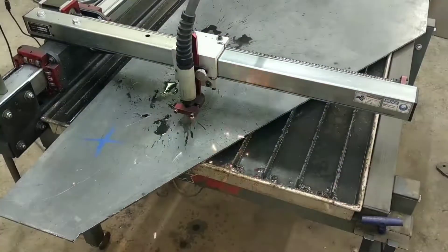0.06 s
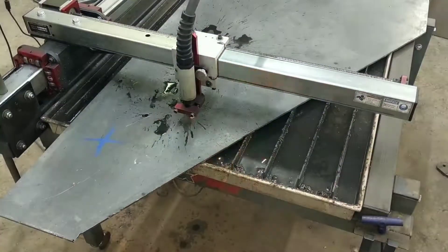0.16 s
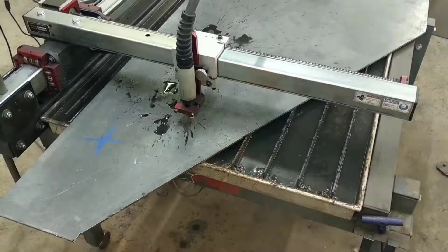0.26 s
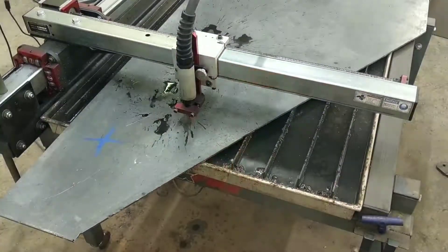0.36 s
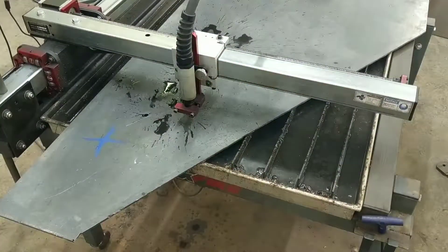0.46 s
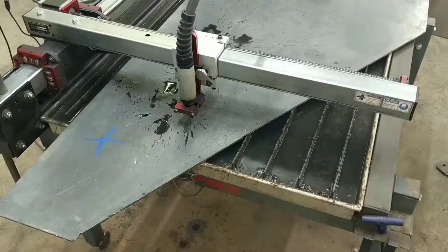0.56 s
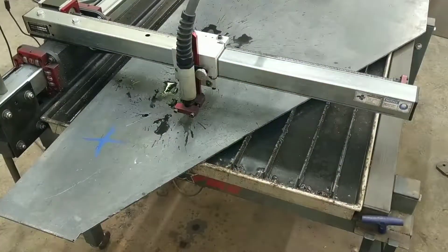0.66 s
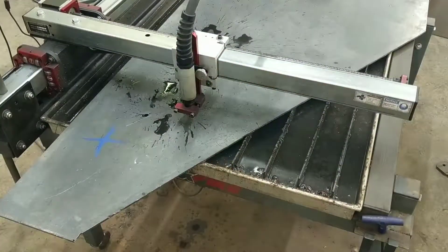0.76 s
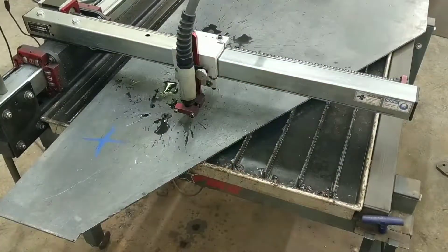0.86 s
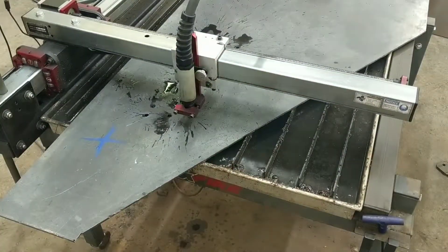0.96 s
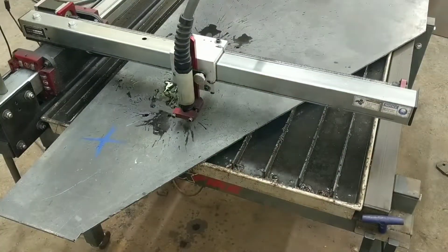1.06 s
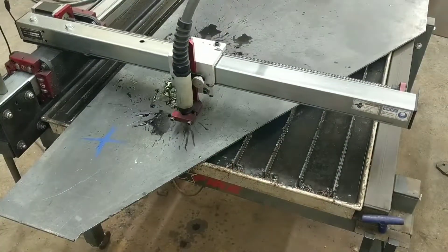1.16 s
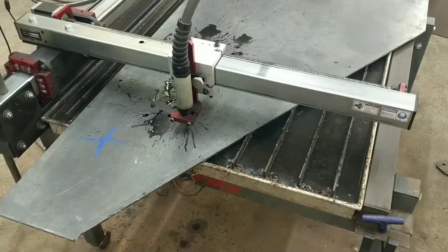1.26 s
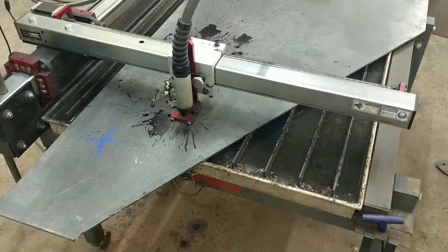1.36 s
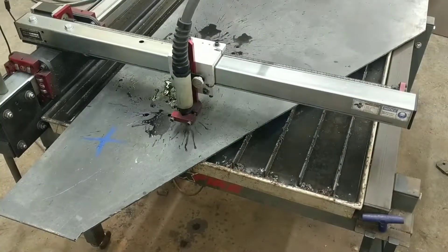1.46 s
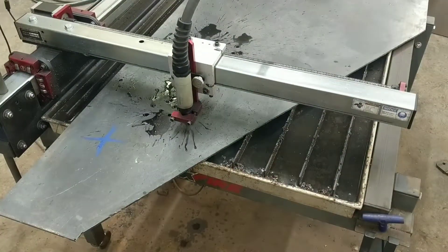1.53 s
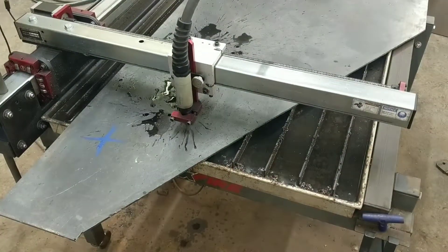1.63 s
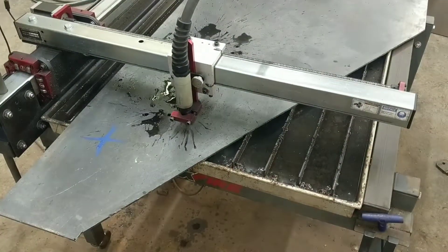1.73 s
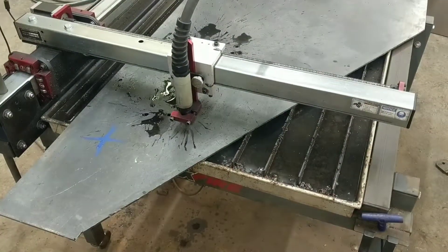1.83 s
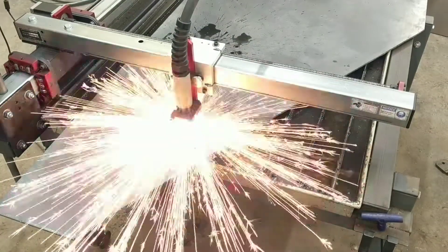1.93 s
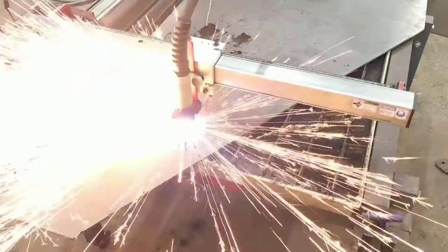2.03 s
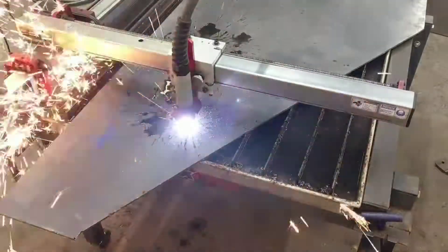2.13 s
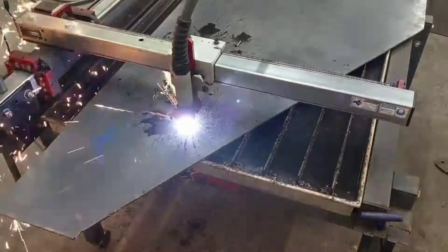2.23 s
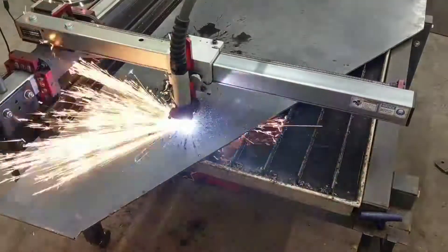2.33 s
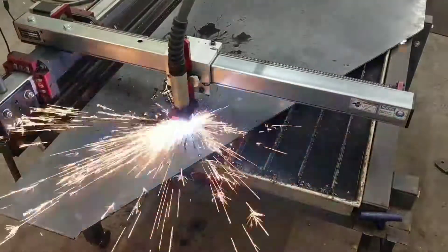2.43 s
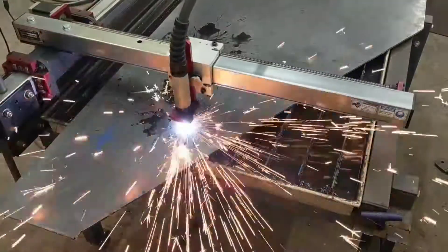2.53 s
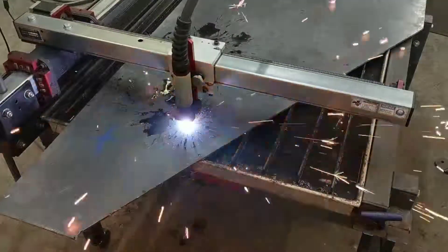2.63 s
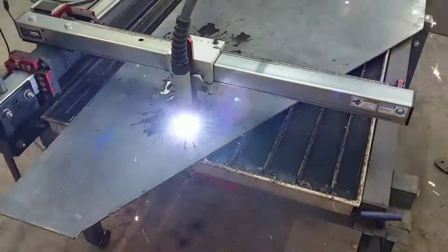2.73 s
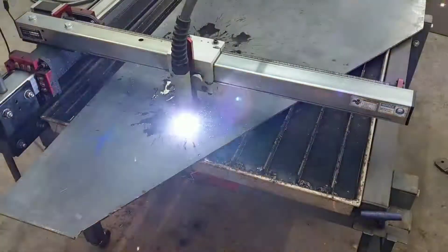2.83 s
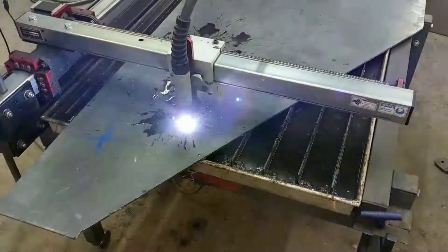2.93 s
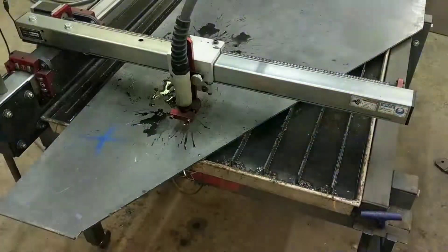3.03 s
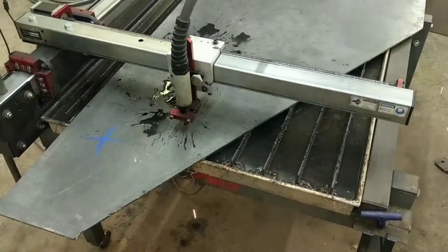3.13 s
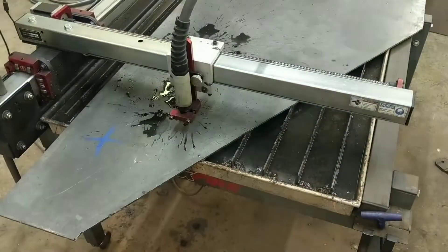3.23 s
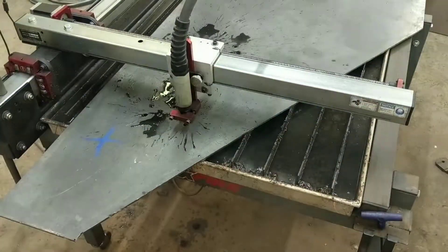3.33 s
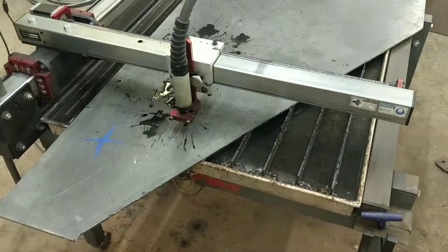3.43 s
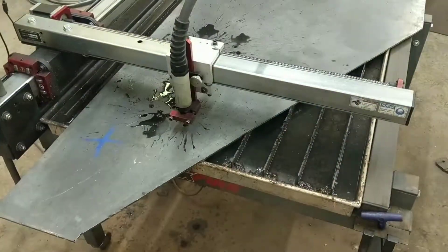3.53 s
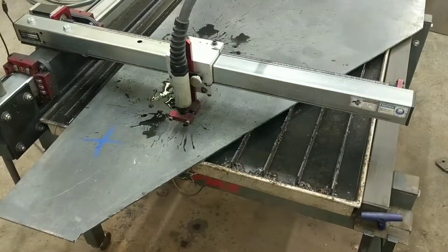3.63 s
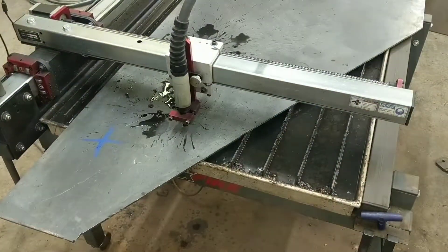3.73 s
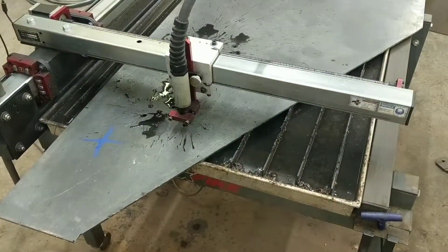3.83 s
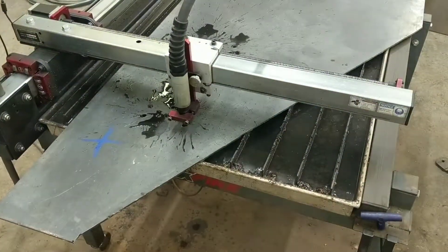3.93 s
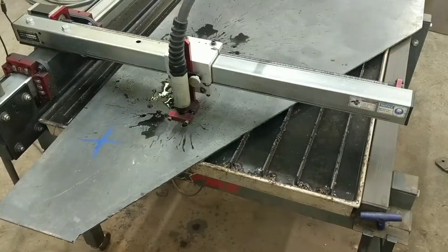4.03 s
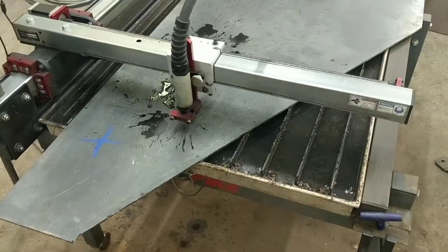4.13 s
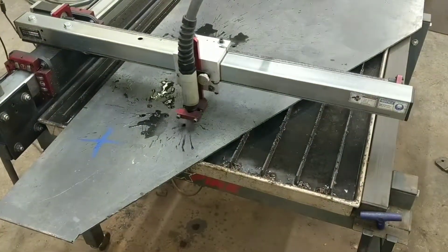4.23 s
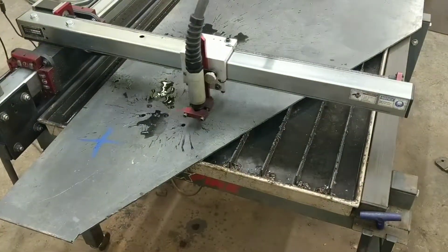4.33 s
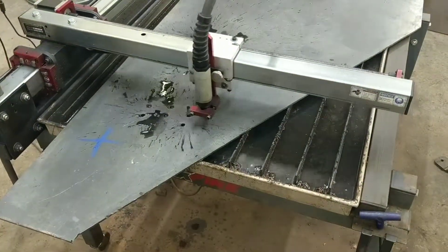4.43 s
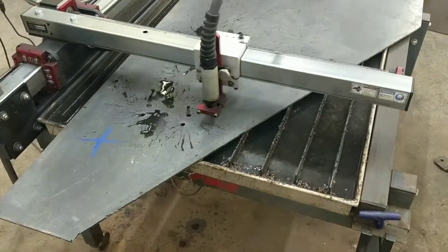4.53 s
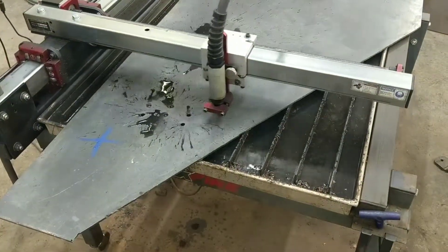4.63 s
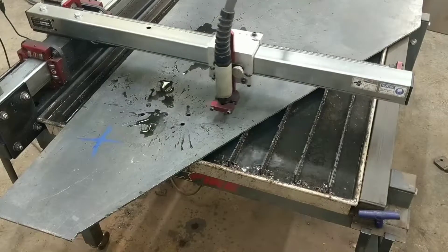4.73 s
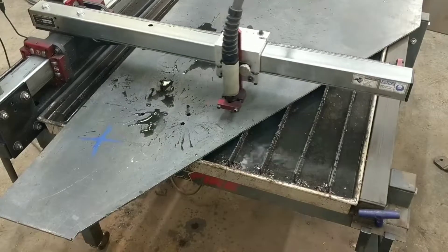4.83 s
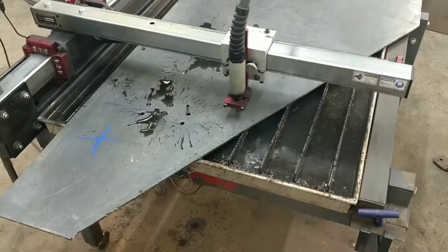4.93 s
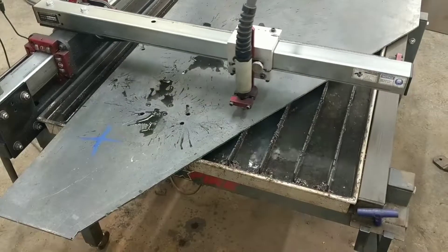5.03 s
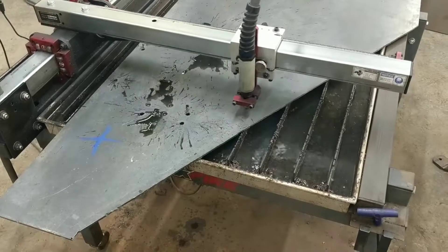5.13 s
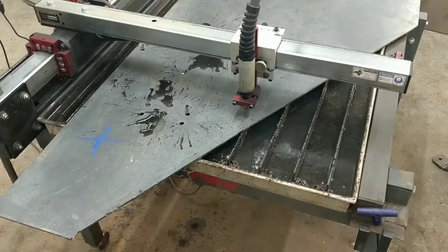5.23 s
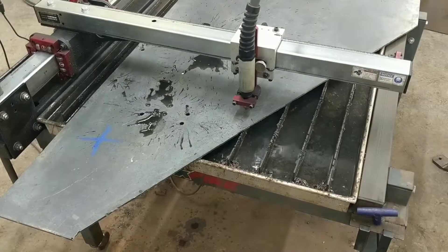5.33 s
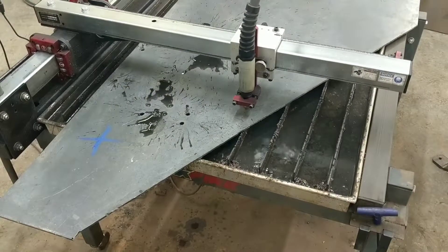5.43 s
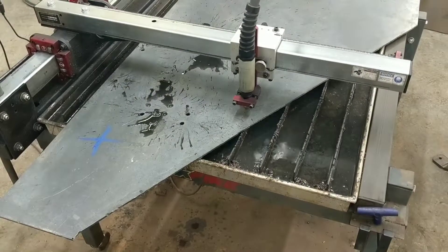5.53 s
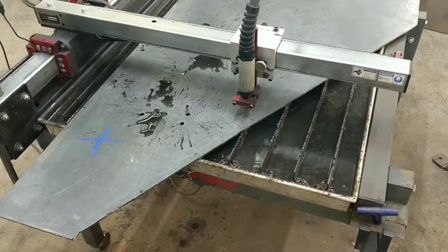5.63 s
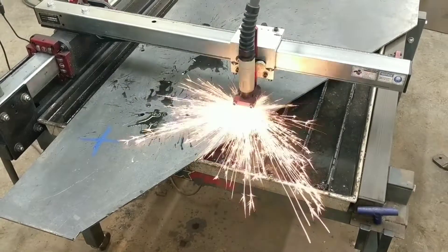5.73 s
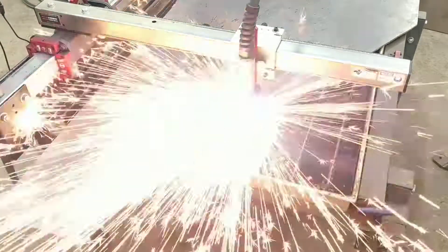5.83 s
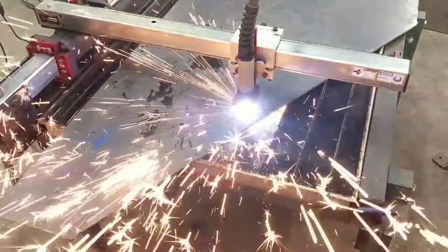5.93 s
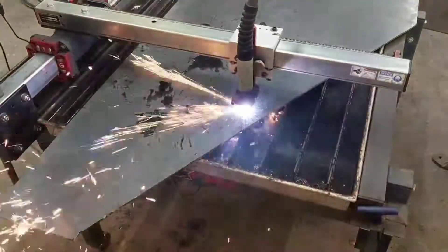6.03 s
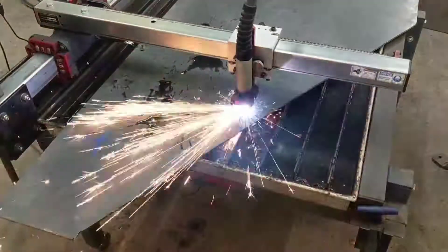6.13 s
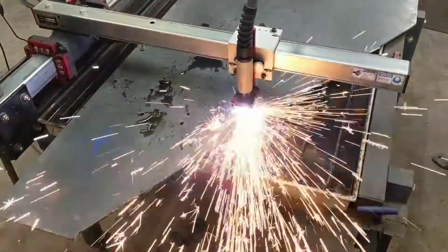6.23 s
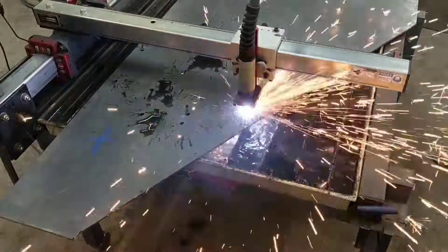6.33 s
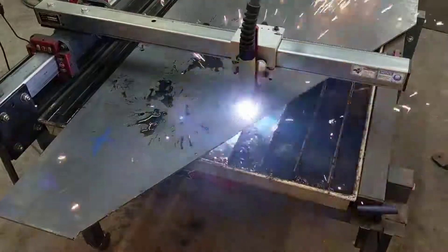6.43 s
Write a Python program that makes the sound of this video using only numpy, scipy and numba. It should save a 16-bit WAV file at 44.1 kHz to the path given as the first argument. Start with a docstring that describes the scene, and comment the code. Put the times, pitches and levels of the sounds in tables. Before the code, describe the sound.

Close up in a workshop, bright compressed air hisses from a cutting torch and bleeds away. A relay clicks and the arc strikes with a sharp pop, a thump and a harsh spitting blast, then roars unevenly under the steel plate with crackling sparks. It snaps off; air hisses and whistles, motors sing as the torch moves, the air dies, and a second strike bursts through into another roaring cut, which is still going at the end.

```python
"""In a workshop, close up, a plasma torch on a gantry table pierces and cuts steel plate, twice.
Compressed air, noise coloured by the nozzle gap, hisses before each cut, then bleeds away; a click, and the arc strikes.
The pierce is a harsh spitting hiss; once through, the jet roars in the slatted tub and rings in the kerf,
with sparks, whistles, pops and thumps on top. Motors whir and sing over a low rumble; echoes add room, and
separate treble noise widens the stereo hiss."""
import sys
import numpy as np
from scipy import signal
from scipy.fft import rfft, irfft, next_fast_len
from scipy.io import wavfile
from scipy.ndimage import uniform_filter1d
from numba import njit

SR = 44100
rng = np.random.default_rng(int(sys.argv[2]) if len(sys.argv) > 2 else 0)


def master(y):
    """Save y as 16-bit WAV."""
    cut = np.clip(np.atleast_2d(y).T, -1, 1)
    pcm = np.round(cut * 32767)  # scale
    wavfile.write(sys.argv[1], SR, pcm.astype(np.int16))


N = 286209


def undb(db):
    """Decibels to gain."""
    return 10 ** (np.asarray(db) / 20)


def to_db(gain):
    """Gain to decibels, safe at silence."""
    return 20 * np.log10(gain + 1e-9)


def since(start):
    """Seconds since a moment; negative before it."""
    return np.arange(N) / SR - start


def decay(t, t60):
    """Exponential fall of 60 dB in t60 seconds."""
    return np.exp(-np.log(1000) * t / t60)


def curve(rows, axis=1):
    """One column of a table, joined by straight lines in time."""
    rows = np.array(rows)
    return np.interp(np.arange(N) / SR, rows[:, 0], rows[:, axis])


def gate(rows, fade=0.02):
    """Open from the first row to the last, fading outside."""
    start, end = rows[0][0], rows[-1][0]
    return curve([(start - fade, 0), (start, 1), (end, 1), (end + fade, 0)])


def running(moves, fade):
    """Gain that is up during each (start, end, level) move."""
    return sum(undb(db) * gate([[start], [end]], fade) for start, end, db in moves)


def walk(rate):
    """Random levels held 1 / rate s and smoothed twice; spread near 1."""
    hold = max(int(SR / rate), 1)
    steps = np.repeat(rng.standard_normal(N // hold + 1), hold)
    return 1.3 * uniform_filter1d(uniform_filter1d(steps, hold), hold)[:N]


def unit(x):
    """Scale to rms 1."""
    return x / np.sqrt(np.mean(x ** 2))


def blend(a, b, share):
    """Mix two unrelated noises at constant power; share is the power of b."""
    share = np.clip(share, 0, 1)
    return np.sqrt(1 - share) * unit(a) + np.sqrt(share) * unit(b)


def add(out, start, sound):
    """Mix a short sound in at its time."""
    i = int(start * SR)
    out[i:i + len(sound)] += sound[:N - i]


def colour(x, points, modes=()):
    """Filter by a broad spectrum with resonances on top."""
    size = next_fast_len(N)
    hz = np.fft.rfftfreq(size, 1 / SR) + 1
    points = np.array(points)
    db = np.interp(np.log(hz), np.log(points[:, 0]), points[:, 1])
    for centre, width, peak_db in modes:
        db = db + peak_db * 2 ** -((2 * (hz - centre) / width) ** 2)
    return irfft(rfft(x, size) * undb(db), size)[:N]


def resonate(x, hz, width):
    """A resonance applied twice, for steep skirts; width is that of one pass."""
    b, a = signal.iirpeak(hz, hz / width, fs=SR)
    return signal.lfilter(b, a, signal.lfilter(b, a, x))


@njit
def sweep(x, hz, q):
    """A resonance whose centre moves; even power at any pitch."""
    y, band, low = np.empty(len(x)), 0., 0.
    for i in range(len(x)):
        g = np.tan(np.pi * hz[i] / SR)
        v = (band + g * (x[i] - low)) / (1 + g * (g + 1 / q))
        band, low = 2 * v - band, low + 2 * g * v
        y[i] = v / np.sqrt(g)
    return y


def turbulence(sputter_db, flutter_db, sputter_rate=450, flutter_rate=55):
    """Noise that sputters from eddy to eddy and flutters with the flow."""
    level_db = sputter_db * walk(sputter_rate) + flutter_db * walk(flutter_rate)
    return rng.standard_normal(N) * undb(level_db)


def spits(rate, spread_db=3, length=0.0011):
    """Sparse cracks of molten metal in uneven sizes, rate per second, each fading over length s."""
    sizes = undb(spread_db * np.minimum(rng.exponential(size=N), 2))
    hits = (rng.random(N) < rate / SR) * sizes
    envelope = signal.lfilter([1], [1, -np.exp(-1 / (length * SR))], hits)
    return unit(envelope * rng.standard_normal(N))


def burst(db, hz, width, t60):
    """A short knock of decaying noise, rung in one band and set to a peak level."""
    t = np.arange(SR // 4) / SR
    sound = resonate(rng.standard_normal(len(t)) * decay(t, t60), hz, width)
    return undb(db) * sound / np.abs(sound).max()


def blips(rows, q):
    """Short swells of noise, each in a band of its own; q is centre over width."""
    out = np.zeros(N)
    for start, db, hz, length in rows:
        swell = np.hanning(int(length * SR))
        ringing = resonate(rng.standard_normal(SR // 4), hz, hz / q)
        add(out, start - length / 2, undb(db) * swell * unit(ringing[-len(swell):]))
    return out


# colour of the low rumble: (frequency [Hz], level [dB])
RUMBLE_COLOUR = [(20, -20), (35, -17), (57, 0.5), (72, -6.5), (86, 0), (110, -12), (190, -12.5), (330, -15),
                 (700, -31.5), (2000, -32), (8000, -34), (13000, -67)]


def rumble():
    """Low noise of the table and the shop."""
    return unit(colour(rng.standard_normal(N), RUMBLE_COLOUR))


# the lift motor moves the torch up or down: (start [s], end [s], level [dB])
LIFT_MOVES = [(1.27, 1.69, -56.5), (4.39, 4.6, -53)]
# bands of the lift motor's whir: (frequency [Hz], level against the move [dB])
LIFT_TONES = [(460, 3), (325, -1.5)]


def lift(width_hz=80):
    """The lift motor whirs roughly: noise in the resonances of its mount."""
    whir = sum(undb(db) * unit(resonate(rng.standard_normal(N), hz, width_hz)) for hz, db in LIFT_TONES)
    return whir * running(LIFT_MOVES, fade=0.059)


# the gantry travels to the next cut: (start [s], end [s], level [dB])
TRAVELS = [(4.42, 5.09, -56)]
# gantry motor tones: (frequency [Hz], level against the travel [dB], waver [share of the pitch])
TRAVEL_TONES = [(1470, 0.5, 0.0013), (1990, 1, 0.0056), (2700, -11, .002)]


def stepper(flicker_db=1.5):
    """The stepper motors sing sines that waver in pitch and flicker in level as the gantry travels."""
    out = 0
    for hz, db, waver in TRAVEL_TONES:
        phase = 2 * np.pi * np.cumsum(hz * (1 + waver * walk(90))) / SR
        out = out + np.sqrt(2) * np.sin(phase) * undb(db + flicker_db * walk(30))
    return out * running(TRAVELS, fade=0.068)


# rumble swells while the machine moves or the jet shakes the table: (start [s], end [s], level [dB])
SHUDDERS = [(0, .38, -51), (1.75, 2.0, -48), (4.3, 5.12, -51.5), (5.52, 5.82, -48.5), (6.09, 6.23, -39.5)]
SHOP_DB = -51.5  # steady low rumble


def machine():
    """Motor whir and stepper tones over a low rumble that swells with each shudder."""
    low = rumble() * np.hypot(undb(SHOP_DB), running(SHUDDERS, fade=0.082))
    return low + lift() + stepper()


def reflections(x, t60):
    """A dense cloud of echoes from table, gantry and walls: decaying noise of unit energy."""
    t = np.arange(SR // 2) / SR
    tail = rng.standard_normal(len(t)) * decay(t, t60) * (t > 0.002)
    return signal.fftconvolve(x, tail / np.linalg.norm(tail))[:N]


# colour of the treble noise that widens the stereo hiss: (frequency [Hz], level [dB])
SIDE_COLOUR = [(2600, -81), (3300, -63), (4000, -28), (5200, 10.5), (6500, 10.5), (8600, 3.5), (10000, 8.5),
               (11500, 4), (14000, 3), (15700, -55)]


def side_hiss(torch, side_db):
    """Separate treble noise widens the stereo hiss, following the loudness of the whole torch sound."""
    shaped = colour(torch, [(2500, -3.5), (4000, -3.0)])
    loudness = np.sqrt(np.abs(uniform_filter1d(shaped ** 2, size=200)))
    side = undb(side_db) * loudness * unit(colour(rng.standard_normal(N), SIDE_COLOUR))
    return colour(side, [(2500, -40), (3800, 0)])


# air flowing with the arc off: (start [s], valve shuts [s])
AIR_RUNS = [(-0.06, 1.619), (3.085, 5.427)]
SAG_DB, RECOVER_S = 1.5, 0.032  # the hiss starts each run weak and recovers
BLEED_DB_PER_S, VALVE_S = 112, 0.025  # the hose empties once the valve has eased shut


def pressure():
    """Air flow in dB below full: it starts weak, recovers, holds, then bleeds away."""
    runs = []
    for start, shut in AIR_RUNS:
        sag = SAG_DB * np.exp(-np.maximum(since(start), 0) / RECOVER_S)
        bleed = BLEED_DB_PER_S * VALVE_S * np.logaddexp(0, since(shut) / VALVE_S)
        runs.append(undb(-sag - bleed) * curve([(start - 0.03, 0), (start, 1)]))
    return to_db(sum(runs))


# full-pressure air, and air at dying pressure: (frequency [Hz], level [dB])
AIR_COLOUR = [(500, -27.5), (1500, -50), (2500, -22), (3200, -15.5), (4000, -13), (6300, -11),
              (7400, -13.5), (9000, -9.5), (11500, -21), (13500, -20.5), (15800, -30.5)]
SLOW_AIR_COLOUR = [(800, -10.5), (2300, -10), (3800, 2.5), (5500, -1.5), (7200, 3), (9200, 1.5),
                   (10200, -9), (12000, -35), (15500, -33)]
# resonances of the gap under the nozzle: (frequency [Hz], width [Hz], level above the colour [dB])
GAP_OVER_KERF = [(3570, 1200, 1.5), (4530, 580, 5.5), (5350, 400, 6), (5770, 210, -2), (7240, 460, -3),
                 (7660, 170, 4), (8690, 900, 7), (9460, 580, 7), (10650, 410, 4.5)]
GAP_OVER_PLATE = [(4270, 270, 2), (5550, 630, 6.2), (8670, 860, 8.2), (9830, 620, 8.6)]
# the torch leaves the old cut: (time [s], share of the jet on solid plate [0 to 1])
ON_PLATE = [(4.1, 0.0056), (4.85, 0.91)]
# the air hiss swells and eases a little: (time [s], level [dB])
AIR_SWELL = [(0, -1), (.25, 1.2), (.9, 1.2), (1.07, 0), (1.13, -0.5), (1.55, -.5), (3.12, -1.6), (3.3, 0),
             (4.2, -0.2), (4.26, -3), (4.33, 0.4), (4.6, -0.5), (4.9, 0), (5.4, 0.5)]
AIR_DB = -30.5  # hiss at full pressure, before the swell


def air_jet(flow_db, dulling=0.61, dull_below_db=-2.5):
    """Air rings the gap under the nozzle; as the pressure bleeds away the top goes first."""
    kerf_flow = turbulence(sputter_db=0.3, flutter_db=1.0, flutter_rate=170)
    plate_flow = turbulence(sputter_db=0.5, flutter_db=0.5, flutter_rate=170)
    over_kerf = colour(kerf_flow, AIR_COLOUR, GAP_OVER_KERF)
    over_plate = colour(plate_flow, AIR_COLOUR, GAP_OVER_PLATE)
    fast = blend(over_kerf, over_plate, curve(ON_PLATE))
    slow = colour(rng.standard_normal(N), SLOW_AIR_COLOUR)
    brightness = undb(dulling * np.minimum(flow_db - dull_below_db, 0)) ** 2
    return blend(slow, fast, brightness) * undb(flow_db + AIR_DB + curve(AIR_SWELL))


# colour of the roar in the tub: (frequency [Hz], level [dB])
TUB_COLOUR = [(50, -45), (140, -11), (270, -3.5), (520, -1.5), (680, 0), (1100, -1.5), (1450, -3),
              (1900, -10.5), (3000, -9.5), (12000, -54)]
# resonances of the tub: (frequency [Hz], width [Hz], level above the colour [dB])
TUB_MODES = [(267, 63, 1.5), (370, 41, -1.5), (516, 57, -3.5), (585, 14, 3), (634, 45, 3.5), (720, 24, 3),
             (779, 39, 6), (949, 43, 5), (1082, 51, 2), (1157, 34, 5), (1303, 41, 4), (1385, 95, -3.5)]
HOLLOW_HZ, HOLLOW_WIDTH_HZ = 441, 61  # hollow note of the tub
HOLLOW_DB, HOLLOW_FLICKER_DB = -11, 3  # its level against the roar, and how much it comes and goes


def tub(throat_hz, focus, sputter_db, flutter_db, throat_q=3):
    """Gas roars into the slatted tub; the hole favours one moving band, and a hollow note comes and goes."""
    gusts = turbulence(sputter_db, flutter_db)
    throat_flow = turbulence(sputter_db, flutter_db)
    throat = sweep(throat_flow, throat_hz * np.exp(0.14 * walk(25)), float(throat_q))
    note = resonate(rng.standard_normal(N), HOLLOW_HZ, HOLLOW_WIDTH_HZ)
    hollow = unit(note * undb(HOLLOW_FLICKER_DB * walk(16)))
    roar = blend(colour(gusts, TUB_COLOUR, TUB_MODES), colour(throat, TUB_COLOUR, TUB_MODES), focus)
    return roar + undb(HOLLOW_DB) * hollow


# colour of the ringing kerf: (frequency [Hz], level [dB])
KERF_COLOUR = [(100, -66), (900, -8.5), (1450, -5), (1900, 2), (2450, -3.5), (2900, -4.5), (3600, -6.5),
               (6000, -44), (12000, -55)]
# resonances of the kerf: (frequency [Hz], width [Hz], level above the colour [dB])
KERF_MODES = [(2010, 32, 0), (2220, 78, 6.5), (2250, 50, -3), (2420, 160, 4), (2540, 60, -2.5),
              (2665, 71, 5.5)]


def kerf(db, edge_hz, edge_q=11, edge_wander=0.14, edge_share=0.26):
    """Gas rings the narrow kerf; in a strong flow an edge tone wanders over it."""
    rush = turbulence(sputter_db=0.5, flutter_db=1.0)
    edge_flow = turbulence(sputter_db=2.0, flutter_db=2.5)
    edge = sweep(edge_flow, edge_hz * np.exp(edge_wander * walk(30)), float(edge_q))
    strong = np.interp(db, [-49, -41], [0, 1])
    rush_ring = colour(rush, KERF_COLOUR, KERF_MODES)
    edge_ring = colour(edge, KERF_COLOUR, KERF_MODES)
    return undb(db) * blend(rush_ring, edge_ring, edge_share * strong)


def under_plate(roar_db, ring_db, throat_hz, edge_hz, focus, sputter_db, flutter_db, bass_db):
    """Tub and kerf sound together while gas passes through; bass_db tilts the roar's low end."""
    roar = unit(colour(tub(throat_hz, focus, sputter_db, flutter_db), [(260, bass_db), (500, 0)]))
    return roar * undb(roar_db) + kerf(ring_db, edge_hz)


# air alone passing through the old cut, one table for each run: (time [s], level under the plate [dB])
AIR_THROUGH = [
    [(0.0, -42), (0.39, -42.5), (0.5, -42.5), (0.76, -40), (0.91, -42), (1.03, -38.5), (1.17, -49.5),
     (1.35, -51.5), (1.57, -48.5), (1.6, -54)],
    [(3.085, -34), (3.14, -37.5), (3.28, -36.5), (3.56, -39), (3.66, -36), (3.73, -38), (4.17, -37.5),
     (4.25, -44), (4.4, -44.5), (4.6, -50.5), (4.92, -63), (5.4, -62)],
]
AIR_ROAR_HZ, AIR_EDGE_HZ = 1036, 2280  # centre of the roar and edge tone, before they wander


def air_through(flow_db, tub_db=0.0, kerf_db=-2, graze_db=-50, roar_follows=0.45, ring_follows=0.99,
                gust_db=1.45):
    """The more air finds the old cut, the louder tub and kerf; on solid plate only a faint ring stays."""
    through = curve(np.vstack(AIR_THROUGH))
    roar_db = through + tub_db + roar_follows * flow_db + gust_db * walk(14)
    ring_db = np.maximum(through + kerf_db, graze_db) + ring_follows * flow_db + gust_db * walk(12)
    focus = np.interp(through, [-46, -37], [0, 0.45])
    return under_plate(roar_db, ring_db, AIR_ROAR_HZ, AIR_EDGE_HZ, focus,
                       sputter_db=0.5, flutter_db=2.0, bass_db=-6)


# the jet catches the kerf edge: (time [s], level [dB], frequency [Hz], length [s])
WHISTLES = [(.12, -39, 2300, 0.047), (.33, -39, 2400, 0.052), (0.392, -41, 1010, 0.035),
            (0.58, -39.5, 3530, .035), (.625, -40, 1920, .04), (.675, -38, 2230, .05),
            (0.758, -38, 2200, 0.063), (2.321, -29, 2390, .036), (2.403, -28.5, 2120, 0.054),
            (2.785, -32, 2500, .06), (3.02, -32, 2800, .02), (3.143, -38, 2630, .03),
            (3.24, -35.5, 2450, 0.044), (3.272, -39, 2400, 0.026), (3.32, -39, 2280, 0.046),
            (3.362, -37, 2480, .035), (3.415, -33, 2680, 0.041), (3.46, -35, 2450, 0.024),
            (3.488, -35.5, 1240, 0.045), (3.507, -27.5, 2220, 0.039), (3.523, -37, 960, 0.039),
            (3.623, -33.5, 2240, .025), (3.626, -33, 790, 0.023), (3.658, -34.5, 2370, .032),
            (3.668, -36.5, 950, 0.039), (3.757, -35, 2200, 0.05), (3.792, -38, 2090, 0.05),
            (3.839, -39, 2200, 0.06), (3.935, -39, 2600, .03), (4.012, -38, 2200, .035),
            (4.1, -39, 2150, 0.048), (4.312, -43, 2170, 0.065), (6.11, -31, 2180, 0.042)]


def whistles():
    """The jet catches the kerf edge and whistles briefly."""
    return blips(WHISTLES, q=8)


# showers of sparks out of the cut: (time [s], level [dB], frequency [Hz], length [s])
SIZZLES = [(2.308, -36, 4500, 0.024), (2.372, -32, 6450, .03), (2.6, -34, 4430, .04),
           (2.737, -31, 7800, .02), (2.797, -31, 6300, .025), (2.826, -29, 5600, 0.013),
           (2.876, -30, 7560, .016), (2.894, -27, 4750, .018), (2.915, -29.5, 6200, 0.028),
           (2.965, -30, 5700, .07), (3.005, -28, 4500, 0.024)]


def sizzles():
    """Showers of sparks sizzle out of the cut as broader swells of treble."""
    return blips(SIZZLES, q=5.1)


# beads of slag on the steel: (time [s], peak level [dB], centre [Hz])
TICKS = [(0.0857, -19, 6000), (1.177, -23, 6000), (2.4165, -15, 2600), (2.7746, -22, 6500),
         (3.6047, -26, 6000)]
TICK_WIDTH_HZ, TICK_T60_S = 10000, 0.006


def slag_ticks(out):
    """Beads of slag crack and tick on the steel."""
    for start, db, hz in TICKS:
        add(out, start, burst(db, hz, TICK_WIDTH_HZ, TICK_T60_S))


# gusts of gas into the tub: (time [s], peak level [dB], centre [Hz], t60 [s])
GUSTS = [(2.272, -20, 450, 0.21), (2.303, -21, 620, 0.072), (2.372, -19, 890, 0.13),
         (2.719, -19.5, 1480, 0.15), (2.875, -18, 1700, 0.11), (6.075, -26, 290, 0.19),
         (6.225, -26, 760, 0.14), (6.243, -30, 2300, .08), (6.366, -26.5, 2130, 0.2)]


def gas_gusts(out):
    """Gusts of gas break through into the tub, each as wide as its centre frequency."""
    for start, db, hz, t60 in GUSTS:
        add(out, start, burst(db, hz, hz, t60))


# pressure waves as the arc strikes, surges and dies: (time [s], level [dB], frequency [Hz], t60 [s])
THUMPS = [(2.0065, -16, 68, .11), (2.0065, -23, 140, .05), (2.008, -30, 50, .25), (2.1345, -30, 130, .04),
          (3.0568, -14, 290, .025), (3.061, -19, 640, .02), (5.823, -31, 130, .03),
          (5.845, -28.5, 105, .035), (5.895, -27.5, 80, .04), (5.910, -32, 60, .05),
          (6.105, -26.5, 65, .06)]


def pressure_thumps(out):
    """Pressure waves thump as decaying low tones with a quick, soft onset."""
    t = np.arange(SR // 4) / SR
    onset = 1 - np.exp(-t / 0.00036)
    for start, db, hz, t60 in THUMPS:
        add(out, start, undb(db) * np.cos(2 * np.pi * hz * t) * onset * decay(t, t60))


# the arc pops in the melt: (time [s], peak level [dB], centre [Hz], t60 [s])
POPS = [(2.007, -26.5, 500, 0.016), (2.133, -22, 260, .04), (2.714, -21, 300, 0.11),
        (2.721, -19, 1500, .025), (2.741, -19, 1000, .025), (3.061, -19, 523, 0.069)]
POP_WIDTH = 2.1  # width of a pop over its centre frequency
SNAP_S, SNAP_DB, SNAP_HZ, SNAP_T60_S = 3.0566, -11, 1500, 0.018  # the arc snaps off after the first cut


def arc_pops(out):
    """The arc pops in the melt, and snaps off at the end of the first cut."""
    add(out, SNAP_S, burst(SNAP_DB, SNAP_HZ, POP_WIDTH * SNAP_HZ, SNAP_T60_S))
    for start, db, hz, t60 in POPS:
        add(out, start, burst(db, hz, POP_WIDTH * hz, t60))


# the arc strikes unpierced plate: (time [s], time to break through [s], hiss level [dB], pop level [dB])
STRIKES = [(2.004, 0.14, -18, -13), (5.8193, 0.15, -18, -15)]
RELAY_LEAD_S, RELAY_DB = 0.014, -30.5  # the relay clicks just before each strike


def strike_clicks(out):
    """A relay clicks, then the arc strikes with a bright pop."""
    for start, _, _, pop_db in STRIKES:
        add(out, start - RELAY_LEAD_S, burst(RELAY_DB, hz=2800, width=3400, t60=0.015))
        add(out, start + 0.0026, burst(pop_db, hz=5470, width=20000, t60=0.0077))


def knocks():
    """All the short knocks of switchgear, slag, gas and arc."""
    out = np.zeros(N)
    for play in (slag_ticks, gas_gusts, pressure_thumps, arc_pops, strike_clicks):
        play(out)
    return out


BUILD_DB, BUILD_S = 10, 0.028  # the blast starts this far down and builds as the pit deepens
COLLAPSE_DB_PER_S = 400  # it dies away once the hole is open


def blast(start, length):
    """Gain of one pierce: sudden start, build-up, collapse when the hole opens."""
    age = np.maximum(since(start), 0)
    db = -BUILD_DB * np.exp(-age / BUILD_S) - COLLAPSE_DB_PER_S * np.maximum(age - length, 0)
    return undb(db) * np.minimum(age / 0.00089, 1)


# colour of the pierce: (frequency [Hz], level [dB])
PIERCE_COLOUR = [(100, -10), (700, -13), (2000, -7), (3300, -3.5), (4500, -2), (6300, -3), (8500, 0),
                 (11500, -7), (13800, -12), (15500, -10)]
# gap resonances, one table for each pierce: (frequency [Hz], width [Hz], level above the colour [dB])
GAP_PIERCING = [
    [(4300, 820, 0.5), (5300, 270, 1), (6160, 1100, -4), (7760, 350, 5.5), (8760, 640, 8.5), (9450, 440, 7),
     (10220, 440, -8), (10530, 320, 8), (14200, 4700, -6)],
    [(4970, 270, 1), (6840, 1000, 6), (7550, 300, -3), (8700, 1140, 11.5), (9450, 250, -1), (10100, 390, 7)],
]
# melt blown out as the plate gives way: (time [s], hiss level [dB], kerf ring level [dB])
GOUTS = [(2.129, -31, -25.5), (5.974, -22, -30), (6.01, -20.5, -42)]
# the loudest spurts of melt: (time [s], level against the steady blast [dB])
SPURTS = [(2.033, -2), (2.036, -9), (2.068, -1), (2.143, -6), (5.841, -3), (5.849, -5), (5.868, -2),
          (5.896, -4), (5.955, -2), (5.968, -6), (5.980, -5)]
GOUT_S, SPURT_S = 0.018, 0.00098  # half the length of a gout; time for a spurt to fall away
PIERCE_EDGE_HZ = 2200  # edge tone of the fresh hole, before it wanders


def piercing(spit_db=-7, tub_db=-21, kerf_db=-21, rumble_db=-25, splash_hz=3700, splash_width=4500):
    """The arc blasts melt off the plate: a harsh, spitting hiss that ends in gouts and shakes the table."""
    swells = [np.exp(-(since(start) / GOUT_S) ** 2) for start, _, _ in GOUTS]
    gout_hiss, gout_ring = undb(np.array(GOUTS)[:, 1:]).T @ swells
    spurts = 1
    for start, db in SPURTS:
        age = since(start)
        spurts = spurts + undb(db) * (age > 0) * np.exp(-np.abs(age) / SPURT_S)
    hiss, force = 0, 0
    for (start, length, db, _), modes in zip(STRIKES, GAP_PIERCING):
        flow = turbulence(sputter_db=-0.3, flutter_db=0.1, flutter_rate=370)
        flow = flow + undb(spit_db) * spits(rate=360)
        gain = undb(db) * blast(start, length) * spurts
        gout_gain = gout_hiss * gate([[start], [start + 2 * length]])
        hiss = hiss + unit(colour(flow, PIERCE_COLOUR, modes)) * np.hypot(gain, gout_gain)
        force = force + gain
    roar = unit(colour(turbulence(sputter_db=2.0, flutter_db=-4.5), TUB_COLOUR, TUB_MODES))
    ring = kerf(to_db(np.hypot(force * undb(kerf_db), gout_ring)), PIERCE_EDGE_HZ)
    splash = gout_ring * unit(resonate(spits(rate=1000), splash_hz, splash_width))
    shake = force * (undb(tub_db) * roar + undb(rumble_db) * rumble())
    return hiss + ring + splash + shake


# arc cutting through, one table for each cut: (time [s], roar level in the tub [dB],
# ring level of the kerf [dB], centre of the roar [Hz], edge tone [Hz])
CUTS = [
    [(2.18, -38, -34, 638, 2290), (2.212, -32, -53, 560, 2350), (2.282, -32, -39, 517, 2110),
     (2.334, -31.5, -31, 750, 2300), (2.374, -24.5, -33, 840, 2000), (2.412, -29.5, -29.5, 840, 1900),
     (2.476, -36, -42.5, 620, 2030), (2.518, -34.5, -36.5, 777, 1840), (2.574, -34, -36, 615, 2030),
     (2.618, -33, -38.5, 849, 2040), (2.654, -35.5, -37, 585, 2560), (2.726, -29.5, -38, 950, 1960),
     (2.784, -31, -34, 755, 2400), (2.962, -31, -30.5, 970, 2230), (3.006, -31.5, -34, 835, 2390),
     (3.045, -30, -32.5, 949, 2570)],
    [(6.045, -36, -36.5, 943, 2560), (6.091, -35, -31.5, 570, 2130), (6.109, -30, -33, 621, 2130),
     (6.129, -32, -30, 796, 2160), (6.143, -36, -31, 891, 2290), (6.201, -27, -35, 728, 2220),
     (6.231, -24, -39, 770, 2270), (6.249, -26, -31, 811, 2300), (6.289, -27, -43, 830, 2230),
     (6.331, -28.5, -36, 955, 2170), (6.365, -30, -29, 748, 2170), (6.379, -32.5, -31.5, 792, 2160),
     (6.419, -33.5, -31.5, 856, 2240), (6.457, -30.5, -33, 777, 2150), (6.463, -35, -34, 806, 2180),
     (6.49, -31, -32, 942, 2250)],
]


def arc_through(tub_db=-0.05):
    """The arc blows through the plate; the harder it roars, the more it favours one band."""
    roar_db, ring_db, throat_hz, edge_hz = (curve(np.vstack(CUTS), axis=k) for k in (1, 2, 3, 4))
    focus = np.interp(roar_db, [-33, -27], [0.05, 0.55])
    sound = under_plate(roar_db + tub_db, ring_db, throat_hz, edge_hz, focus,
                        sputter_db=1.5, flutter_db=0.8, bass_db=2.0)
    return sound * sum(gate(rows, fade=0.053) for rows in CUTS)


# colour of the cutting arc: (frequency [Hz], level [dB])
CUT_COLOUR = [(500, -15), (2000, -49), (3300, -2.5), (4600, -5.5), (6000, -2.5), (7700, -1), (9200, 3),
              (11200, -7), (13000, -12.5), (15500, -14)]
# gap resonances, one table for each cut: (frequency [Hz], width [Hz], level above the colour [dB])
GAP_CUTTING = [
    [(4440, 550, 6), (7670, 250, 6.5), (8600, 510, 6.5), (9530, 650, 3.5), (10300, 500, -1)],
    [(3420, 400, 1), (4500, 760, 5), (7700, 290, -1), (8750, 630, 5), (9700, 500, -4), (10200, 300, 3)],
]
# hiss of the arc, one table for each cut: (time [s], level against its overall level [dB])
ARC_HISS = [
    [(2.18, -32), (2.218, -33), (2.29, -31.5), (2.322, -26.5), (2.385, -26), (2.44, -33), (2.48, -34),
     (2.508, -30), (2.608, -27), (2.64, -29), (2.71, -29.5), (2.825, -24.5), (2.95, -24.5), (3.035, -23.5)],
    [(6.052, -25.5), (6.1, -27.5), (6.16, -28.5), (6.319, -31.5), (6.49, -27.5)],
]


def cutting(spit_db=-5, arc_db=-0.74, shield_db=-36, sizzle_hz=5600, sizzle_q=5, sizzle_wander=0.29,
            sizzle_share=0.16):
    """Once through, the arc surges; sparks crackle and sizzle in patches over the hiss of shield air."""
    flow = turbulence(sputter_db=-0.5, flutter_db=0.5, flutter_rate=130)
    flow = flow + undb(spit_db) * spits(rate=300)
    sizzle_centre = sizzle_hz * np.exp(sizzle_wander * np.clip(walk(45), -2, 2))
    sizzle = sweep(turbulence(sputter_db=3.0, flutter_db=4.0), sizzle_centre, float(sizzle_q))
    shield_flow = turbulence(sputter_db=1.0, flutter_db=3.5)
    shield = unit(colour(shield_flow, AIR_COLOUR, GAP_OVER_KERF)) * undb(shield_db)
    out = 0
    for rows, modes in zip(ARC_HISS, GAP_CUTTING):
        arc = blend(colour(flow, CUT_COLOUR, modes), colour(sizzle, CUT_COLOUR, modes), sizzle_share)
        out = out + (arc * undb(curve(rows) + arc_db) + shield) * gate(rows, fade=0.052)
    return out


def scene(room_db=-11, side_db=-11.5):
    """Everything sits in the middle; only the separate treble noise spreads."""
    flow_db = pressure()
    air = air_jet(flow_db) + air_through(flow_db)
    arc = piercing() + cutting() + arc_through()
    torch = air + arc + whistles() + sizzles() + knocks()
    mid = torch + undb(room_db) * reflections(torch, t60=0.049) + machine()
    side = side_hiss(torch, side_db)
    return np.array([mid + side, mid - side])


def record(dry, ceiling=0.65, low_hz=32, top_hz=15750):
    """The pickup drops the deepest bass, rounds the highest peaks and cuts the top."""
    dry = signal.sosfilt(signal.butter(2, low_hz, "high", fs=SR, output="sos"), dry)
    rounded = ceiling * np.tanh(dry / ceiling)
    return signal.sosfilt(signal.ellip(10, 0.2, 80, top_hz, fs=SR, output="sos"), rounded)


dry = scene()
out = record(dry)
master(out)
```